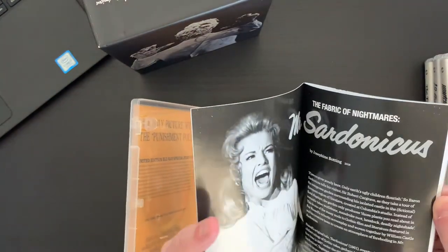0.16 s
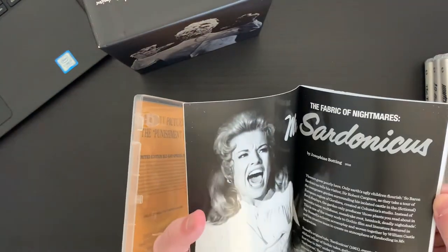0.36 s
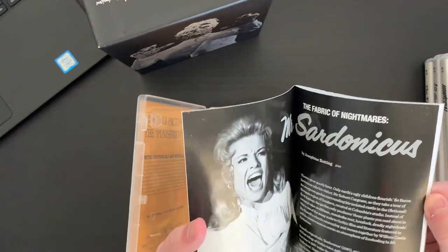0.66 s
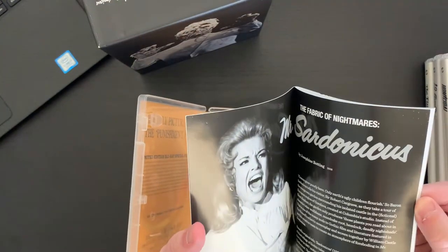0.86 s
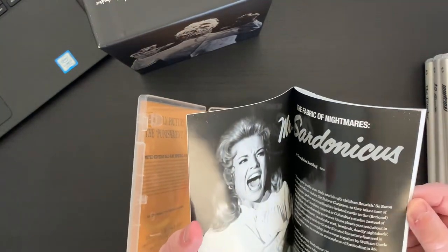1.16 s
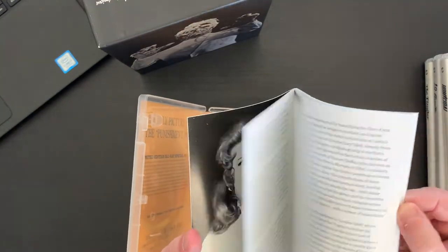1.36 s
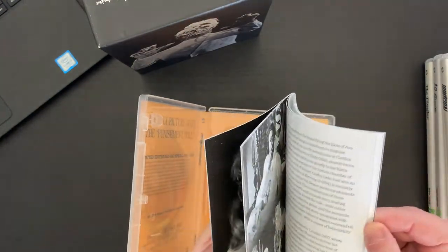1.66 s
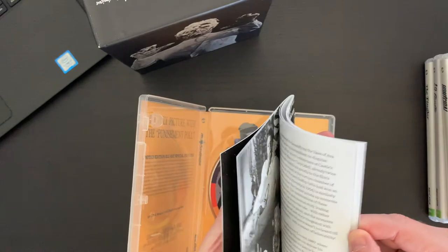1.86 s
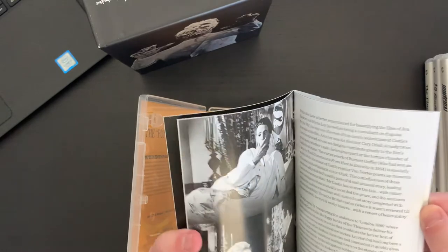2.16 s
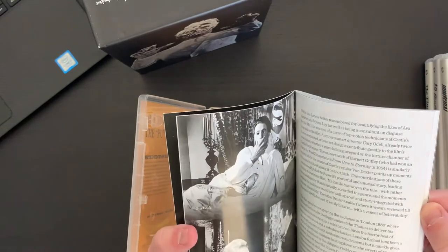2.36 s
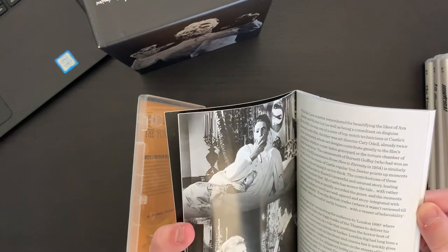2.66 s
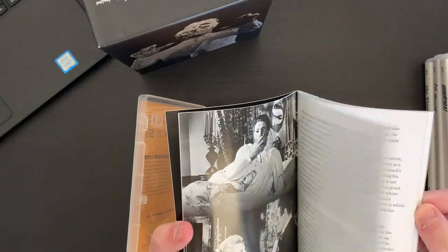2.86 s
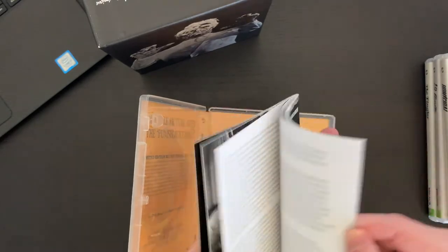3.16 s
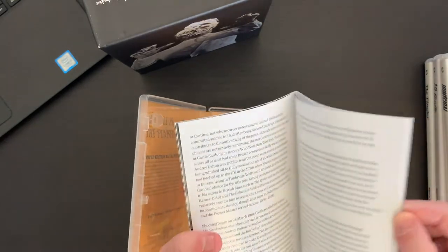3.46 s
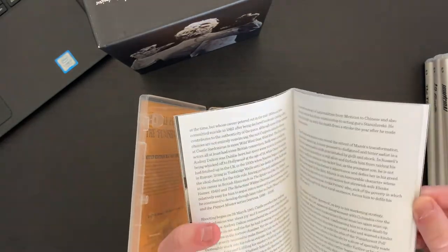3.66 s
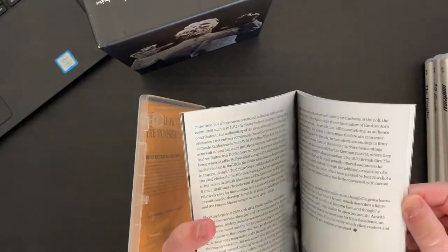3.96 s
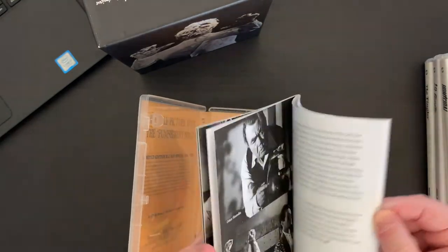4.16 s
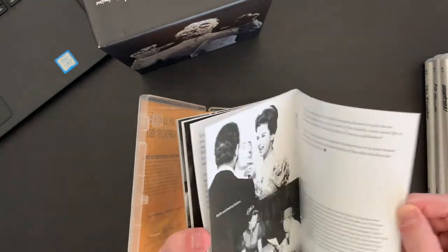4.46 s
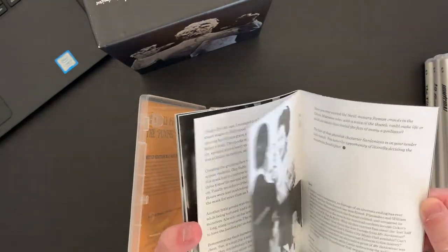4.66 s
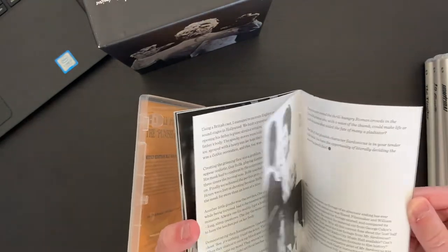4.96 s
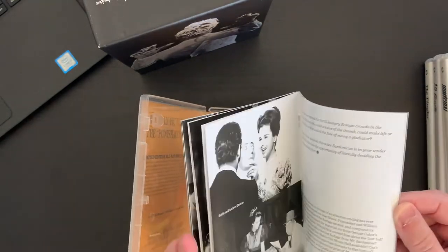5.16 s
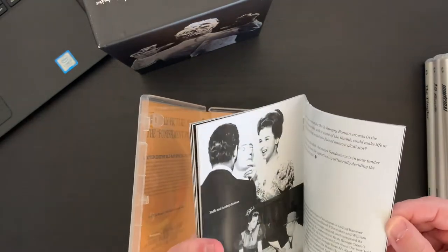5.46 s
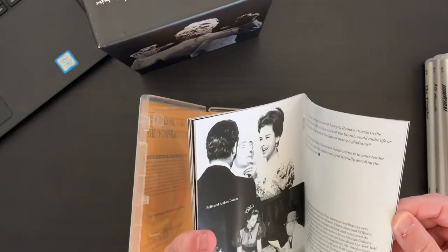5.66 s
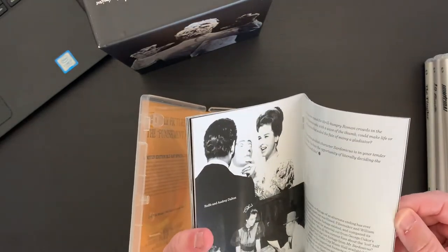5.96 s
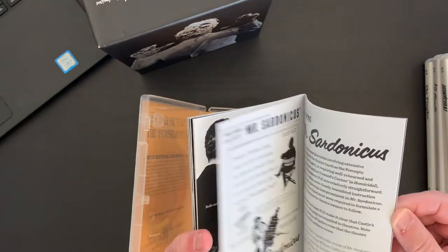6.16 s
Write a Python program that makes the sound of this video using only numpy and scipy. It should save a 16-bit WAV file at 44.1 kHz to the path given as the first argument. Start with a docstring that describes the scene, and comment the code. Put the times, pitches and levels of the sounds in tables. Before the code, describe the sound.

Glossy booklet pages are leafed through by hand with crisp flicks, papery rustles and tiny ticks over a soft throbbing fan hum in a quiet room.

```python
"""Booklet leafed through by hand

Small quiet room, phone microphone close to a glossy booklet held over its plastic case on a desk.
Page edges scrape off the thumb and snap: fibre noise, a crack and short sine rings of the bent sheet.
Sheets slide and rub as grainy noise, the bent spine ticks, pages flop down and the case wobbles.
Behind, two fans hum at nearly the same speed and throb against each other; one is slowly losing speed.
The hum is drifting sine tones, the still air shaped noise; a short room tail follows the paper."""
import sys
import numpy as np
from scipy import signal
from scipy.fft import rfft, irfft, next_fast_len
from scipy.io import wavfile

SR = 44100
rng = np.random.default_rng(int(sys.argv[2]) if len(sys.argv) > 2 else 0)


def persist_wave(psi):
    """Save psi, clipped to +-1, as 16-bit WAV."""
    counts = np.round(np.clip(psi, -1, 1) * 32767).astype(np.int16)
    wavfile.write(sys.argv[1], SR, np.atleast_2d(counts).T)


N = 279153
T = np.arange(N) / SR

# Page edges snapping free: (time [s], scrape before trim [dB], crack [dB], rise [s], body shelf [dB],
# treble shelf [dB], rings of the sheet as (pitch [Hz], level before trim [dB]))
PAGE_FLICKS = [ (0.292, -60, -67, 0.00071, 13, 1, [(800, -66), (1500, -59), (3300, -68)]),
               (1.131, -59.5, -73, 0.0013, 9, -14, [(1200, -74), (2100, -67)]),
               (1.156, -51.5, -57, 0.00091, 7, -10, [(850, -59), (1200, -55.5), (2380, -55.5), (4500, -65),
               (6000, -65.5)]), (1.2645, -48.5, -56, 0.0041, -2, -10, [(1180, -66), (1480, -56),
               (2330, -51), (3230, -56)]), (2.205, -50, -63, 0.00075, -13, -3, [(1750, -62), (2700, -63),
               (4200, -65), (5500, -62)]), (2.79, -54.5, -50, 0.00025, 5.5, -10, [(1850, -54), (2380, -49),
               (3200, -57)]), (3.817, -53, -54.5, 0.0011, 7, 1.5, [(1780, -51), (4770, -57.5),
               (10500, -65)]), (4.2082, -46.5, -47, 0.0042, 2.5, 2.5, [(480, -61), (1420, -44.5),
               (2600, -51), (3480, -46)]), (4.2626, -43.5, -46, 0.0028, -2.5, 0, [(1520, -46.5),
               (3600, -45), (4130, -49), (5310, -43.5)]), (5.9884, -58, -74, 0.0015, 14, 8, [(2710, -46.5),
               (7500, -60)]), ]
# Spectrum of a snapping edge: (frequency [Hz], level [dB])
EDGE_SPECTRUM = [(100, -14), (250, -2.5), (450, -1.5), (900, -4.5), (1500, 2), (2400, 3), (3500, 0),
                 (4500, -4.5), (6500, -2.5), (9000, -17), (12000, -13.5), (16000, -39)]
# Spectrum of the crack at the moment of release: (frequency [Hz], level [dB])
CRACK_SPECTRUM = [(1500, 5), (5000, -13.5), (8000, 2.5), (12000, 1), (16000, -10)]
# Strokes of one sheet over another: (time [s], length [s], attack [s], friction [dB],
# edge hiss before trim [dB])
SHEET_SLIDES = [ (0.0, .3, 0.0032, -70, -85), (1.28, .04, 0.0092, -72.5, -90),
                (1.39, 0.055, 0.032, -75.5, -87), (1.627, 0.028, .015, -75.5, -88),
                (1.736, 0.077, 0.018, -79, -87), (1.845, 0.32, 0.017, -81.5, -88.5),
                (2.987, 0.21, 0.13, -73.5, -75), (3.245, 0.078, 0.032, -76.5, -77.5),
                (3.483, 0.077, 0.0044, -78, -78), (3.674, 0.051, .015, -82.5, -99),
                (4.052, 0.075, .015, -78.5, -92), (4.977, 0.0069, 0.0027, -76.5, -76),
                (5.047, 0.074, .025, -82, -92), (5.206, 0.045, 0.022, -73, -82), ]
# Spectrum of sliding faces: (frequency [Hz], level [dB])
SHEET_SPECTRUM = [(200, -6), (500, -5), (780, -2), (1000, -9), (1250, 1), (1500, 3.5), (1950, -4.5),
                  (2350, -3), (3000, -3.5), (3800, -5.5), (6000, -18.5), (12000, -36.5)]
# Spectrum of a hissing edge: (frequency [Hz], level [dB])
HISS_SPECTRUM = [(2500, -5), (5000, 4.5), (8000, 1), (12000, -7), (16000, -11)]
# Pages landing on the stack: (time [s], level [dB], rise [s], fall [s], treble shelf [dB])
PAGE_FLOPS = [(3.21, -65, 0.0096, 0.022, -17), (4.2756, -57.5, 0.0058, 0.018, 12.5),
              (4.284, -51.5, 0.0033, 0.0066, -1), (4.305, -68.5, 0.0073, 0.051, 5),
              (4.375, -65, 0.0052, 0.0087, 1), (4.397, -64, 0.012, 0.012, -21),
              (4.454, -71, .003, .008, -12)]
# Spectrum of a landing page: (frequency [Hz], level [dB])
FLOP_SPECTRUM = [(80, -8), (200, 10.5), (370, 3), (510, 4.5), (680, 4.5), (900, 0.5), (1400, 0),
                 (2200, -3.5), (4500, -4), (7000, -14), (15000, -26)]
# Held case knocking and wobbling: (pitch [Hz], level [dB], 60 dB decay [s])
CASE_MODES = [(103, -64, 1), (125.2, -57, 0.93), (179.4, -66.5, 0.69), (328, -71, 0.06),
              (522, -48.5, 0.044), (1247, -52.5, 0.061)]
# A sheet brushing along its neighbour: (time [s], length [s], singing [dB], pitch [Hz], width [Hz],
# edge hiss [dB])
SHEET_RUBS = [(0.157, 0.15, -77, 4670, 1500, -92), (0.212, 0.14, -78, 1450, 300, -91),
              (1.96, 0.23, -81.5, 1870, 1100, -94), (2.412, 0.03, -79, 1930, 900, -90),
              (3.041, 0.043, -71, 2700, 1380, -88), (4.072, 0.018, -82, 5000, 1210, -74),
              (3.485, 0.077, -70, 2240, 350, -72.5), (3.792, 0.019, -76, 2440, 1400, -88),
              (4.152, 0.033, -76, 3040, 500, -89), (4.533, 0.061, -74, 1850, 1120, -82),
              (5.223, 0.074, -75.5, 2860, 330, -77.5), (5.653, .06, -85, 2620, 200, -97),
              (5.891, 0.013, -85, 2680, 250, -95)]
# Ticks of the bent spine and the pages: (time [s], level [dB], ring pitch at the tick [Hz],
# plain click against that level [dB])
SPINE_TICKS = [ (0.046, -65, 3620, 6), (0.141, -66.5, 1900, 6), (0.739, -76.5, 4040, 9.5),
               (0.8145, -59, 3660, -5.5), (0.8454, -65.5, 3530, 0.5), (0.9095, -63.5, 3560, -4),
               (0.913, -70, 1960, 5.5), (0.991, -58, 3450, -4.5), (1.0783, -60.5, 3510, -3.5),
               (1.088, -64.5, 1300, -15), (1.151, -72, 2430, 12), (1.2135, -68, 3280, 0),
               (2.284, -71, 2690, 9.5), (2.787, -64.5, 2330, 7), (3.492, -65.5, 2300, 6.5),
               (3.828, -54, 1757, -22), (4.395, -61, 1420, -5), (5.225, -75, 2920, 9),
               (5.9914, -57.5, 1188, -13), (6.1264, -74, 2600, 1), ]
# Harmonics of the slowing fan, from the first up: (starting level [dB], drift [dB per s])
FAN_HARMONICS = [(-66.5, -0.39), (-66, -1.17), (-88.5, 1.08)]
# Steady pitches of the other fan and the mains: (pitch [Hz], starting level before trim [dB],
# drift [dB per s])
HUM_LINES = [(79.4, -73, 0), (120, -88, 0), (145.25, -71, -2), (158.8, -86, 0), (238.2, -88, -1)]
# Spectrum of the still air of the room: (frequency [Hz], level [dB])
AIR_SPECTRUM = [(20, 4), (40, -5), (70, -8), (105, -17), (180, -19), (300, -24), (500, -30), (1000, -33.5),
                (2000, -35.5), (4000, -39), (8000, -41), (14000, -44.5)]

SCRAPE_FADE_S, SHEET_RING_S = 0.0018, 0.0024  # every snap dies away alike
SLIDE_PUSH_DB = 0.5  # the hand presses harder from start to end of a stroke
SLIDE_RELEASE_S = 0.029  # a sheet coasts to a stop
CASE_S = 4.279  # when the case starts to wobble
FAN_HZ, FAN_SAG_HZ_PER_S = 74.32, 0.18
HUM_TRIM_DB, WAVER_DB = -0.86, 1.5
AIR_DB, DRAUGHT_DB = -67.5, -48.5
TOP_HZ = 15400


def undb(db):
    """Decibels to gain."""
    return 10 ** (np.asarray(db) / 20)


def unit(x):
    """Scale to rms 1."""
    return x / np.sqrt(np.mean(x ** 2))


def add(out, s, x):
    """Mix x in from time s on."""
    i = max(int(s * SR), 0)
    out[i:i + len(x)] += x[:max(N - i, 0)]


def colour(x, points, body_db=0, treble_db=0):
    """Shape x by a (Hz, dB) spectrum of unit power, then by a low and a high shelf."""
    size = next_fast_len(len(x))
    f = np.fft.rfftfreq(size, 1 / SR) + 1e-3  # keeps the logarithm finite at 0 Hz
    hz, db = np.transpose(points)
    curve = undb(np.interp(np.log(f), np.log(hz), db))
    bass_cut = 1 + (hz[0] / 2 / f) ** 2  # falls away below the first point
    gain = unit(curve / bass_cut)
    body = body_db / (1 + (f / 900) ** 2)
    treble = treble_db / (1 + (4000 / f) ** 2)
    return irfft(rfft(x, size) * gain * undb(body + treble), size)[:len(x)]


def resonate(x, hz, width_hz):
    """One resonance, gain 1 at its centre."""
    return signal.lfilter(*signal.iirpeak(hz, hz / width_hz, SR), x)


def walk(rate):
    """Slow chance: random points, rate per second, joined by lines, with a spread a little under 1."""
    return np.interp(T * rate, np.arange(4096), rng.standard_normal(4096))


def fibres(size, spread_db):
    """Dense tiny slips of paper fibres, a few much stronger than the rest."""
    strength = np.minimum(rng.exponential(size=size), 5)
    return unit(rng.standard_normal(size) * undb(spread_db * strength))


def swell(t, rise_s, fall_s):
    """Pressure builds up until t = 0, then lets go."""
    return np.exp(np.minimum(t, 0) / rise_s - np.maximum(t, 0) / fall_s)


def flicks(scrape_trim_db=-0.53, ring_trim_db=0.73, crack_s=0.00055, unbend=0.039,
           linger_db=-19, linger_s=0.016, linger_width_hz=850, shiver_db=-18, shiver_s=0.046):
    """An edge scrapes off the thumb ever harder and snaps; the bent sheet rings at pitches set by its curl."""
    out = np.zeros(N)
    t = np.arange(-1024, 6144) / SR
    # the rings sink a little as the sheet straightens
    bent_t = t - unbend * np.maximum(t - 0.002, 0)
    for s, scrape_db, crack_db, rise, body_db, treble_db, rings in PAGE_FLICKS:
        # the scrape leaves a broad papery shiver behind
        contact = swell(t, rise, SCRAPE_FADE_S) + undb(shiver_db) * swell(t, 2 * rise, shiver_s)
        scrape = colour(fibres(len(t), 1.35), EDGE_SPECTRUM, body_db, treble_db) * contact
        crack = colour(rng.standard_normal(len(t)), CRACK_SPECTRUM) * swell(t, crack_s / 2, crack_s)
        snap = undb(scrape_db + scrape_trim_db) * scrape + undb(crack_db) * crack
        for hz, mode_db in rings:
            tone = np.sqrt(2) * np.sin(2 * np.pi * (hz * bent_t + rng.random()))
            ring = tone * swell(t, rise * 0.67, SHEET_RING_S)
            # small buckles go on crinkling around the same pitch
            crinkle = unit(resonate(fibres(len(t), 6.4), hz, linger_width_hz)) * swell(t, rise, linger_s)
            snap = snap + undb(mode_db + ring_trim_db) * (ring + undb(linger_db) * crinkle)
        add(out, s + t[0], snap)
    return out


def slides(hiss_trim_db=1, catch_db=2.35):
    """Sheets slide in small catches: a grainy rustle from the faces, a fine hiss from the edge."""
    face, edge = np.zeros(N), np.zeros(N)
    for s, length, attack, face_db, edge_db in SHEET_SLIDES:
        speed = stroke(s, length, attack)
        face += speed * undb(face_db)
        edge += speed * undb(edge_db)
    rustle = colour(fibres(N, 3.56), SHEET_SPECTRUM) * face
    hiss = colour(fibres(N, 3.7), HISS_SPECTRUM) * edge * undb(hiss_trim_db)
    return (rustle + hiss) * undb(catch_db * walk(160))


def stroke(s, length, attack):
    """Speed of one slide: it gets going, the push grows, it coasts to rest."""
    t = T - s
    start = np.clip(t / attack, 0, 1)
    push = undb(SLIDE_PUSH_DB * (np.clip(t / length, 0, 1) - 1))
    coast = np.exp(-np.maximum(t - length, 0) / SLIDE_RELEASE_S)
    return start * push * coast


def flops():
    """Pages land with a soft slap; the heaviest bunch sets the case wobbling in decaying sine modes."""
    out = np.zeros(N)
    t = np.arange(-2048, 16384) / SR
    for s, db, rise, fall, treble_db in PAGE_FLOPS:
        slap = colour(fibres(len(t), 1.1), FLOP_SPECTRUM, 0, treble_db) * swell(t, rise, fall)
        add(out, s + t[0], undb(db) * slap)
    for hz, db, t60 in CASE_MODES:
        wobble = np.sin(2 * np.pi * hz * t) * swell(t, 0.0034, t60 / np.log(1000))
        add(out, CASE_S + t[0], undb(db) * wobble)
    return out


def rubs(grain_db=5.5):
    """Gritty friction drives one resonance of the curled sheet while its edge hisses."""
    out = np.zeros(N)
    for s, length, sing_db, hz, width_hz, hiss_db in SHEET_RUBS:
        grit = fibres(SR // 4, grain_db)
        stage_hz = width_hz * 1.6  # two stages in a row narrow to about width_hz
        sing = unit(resonate(resonate(grit, hz, stage_hz), hz, stage_hz))
        rub = undb(sing_db) * sing + undb(hiss_db) * colour(grit, HISS_SPECTRUM)
        window = signal.windows.tukey(min(int(length * SR), len(grit)), 0.45)
        add(out, s, rub[:len(window)] * window)
    return out


def ticks(ring_s=0.00086, click_s=0.0032, sag=0.13, dull_db=-7):
    """A tiny click and a few cycles of ring that sag in pitch."""
    out = np.zeros(N)
    t = np.arange(-128, 896) / SR
    for s, db, hz, click_db in SPINE_TICKS:
        phase = np.cumsum(hz * (1 - sag * np.tanh(t / 0.0013))) / SR
        ring = 2 * np.sin(2 * np.pi * phase) * swell(t, 0.0003, ring_s)
        click = colour(fibres(len(t), 0.67), EDGE_SPECTRUM, 2.3, dull_db) * swell(t, 0.0008, click_s)
        add(out, s + t[0], undb(db) * (ring + undb(click_db) * click))
    return out


def room(x, desk_s=0.0102, desk_db=-15, wet_db=-14, t60_s=0.26, treble_t60_s=0.34):
    """One early reflection, then a short tail whose treble is weaker but dies away more slowly."""
    t = np.arange(SR // 2) / SR
    noise = rng.standard_normal(len(t))
    low = signal.sosfilt(signal.butter(2, 3500, fs=SR, output="sos"), noise)
    high = signal.sosfilt(signal.butter(2, 3500, "high", fs=SR, output="sos"), noise)
    low_tail = low * np.exp(-np.log(1000) * t / t60_s)
    high_tail = high * np.exp(-np.log(1000) * t / treble_t60_s)
    tail = low_tail - 0.27 * high_tail
    tail *= 1 - np.exp(-(t / 0.0034) ** 2)  # soft onset
    response = undb(wet_db) * tail / np.sqrt(np.sum(tail ** 2))
    response[int(desk_s * SR)] += undb(desk_db)
    return x + signal.fftconvolve(x, response)[:N]


def background():
    """A slowing fan throbs at a changing pace against steady pitches; still air, an inaudibly low draught."""
    turns = FAN_HZ * T - FAN_SAG_HZ_PER_S * T ** 2 / 2
    fan = sum(hum_line(k * turns, db, drift_db) for k, (db, drift_db) in enumerate(FAN_HARMONICS, 1))
    steady = sum(hum_line(hz * T, db + HUM_TRIM_DB, drift_db) for hz, db, drift_db in HUM_LINES)
    air = colour(rng.standard_normal(N), AIR_SPECTRUM)
    draught_band = signal.butter(2, [2.5, 8], "band", fs=SR, output="sos")
    draught = unit(signal.sosfilt(draught_band, rng.standard_normal(N)))
    return fan + steady + undb(AIR_DB) * air + undb(DRAUGHT_DB) * draught


def hum_line(cycles, db, drift_db):
    """One tone whose level drifts and wavers a little."""
    level_db = db + drift_db * T + WAVER_DB * walk(3.3)
    return np.sqrt(2) * undb(level_db) * np.cos(2 * np.pi * cycles)


def scene():
    """All paper sounds in the room, over the hum."""
    paper = flicks() + slides() + flops() + rubs() + ticks()
    return (room(paper) + background())[None]


def record(dry):
    """The phone cuts the top with a steep low-pass."""
    return signal.sosfilt(signal.ellip(10, 0.1, 80, TOP_HZ, fs=SR, output="sos"), dry)


dry = scene()
out = record(dry)
persist_wave(out)
```